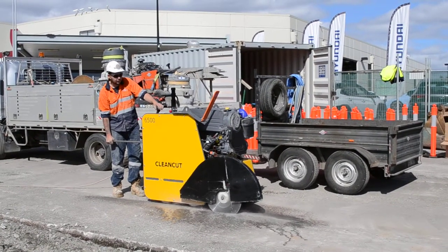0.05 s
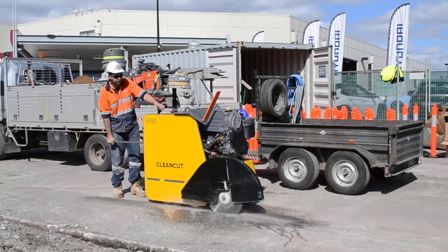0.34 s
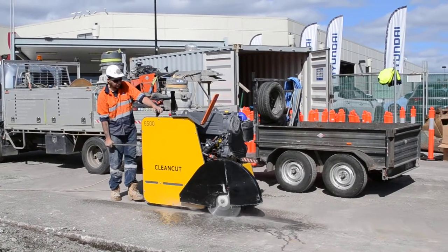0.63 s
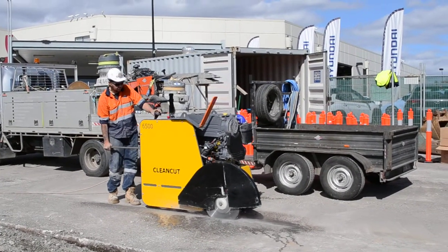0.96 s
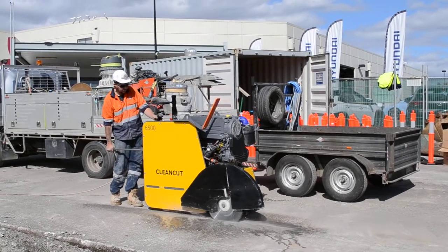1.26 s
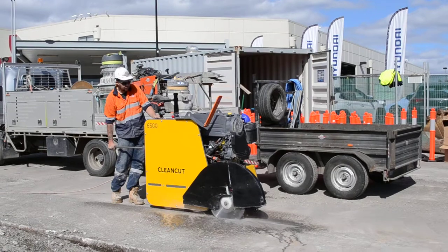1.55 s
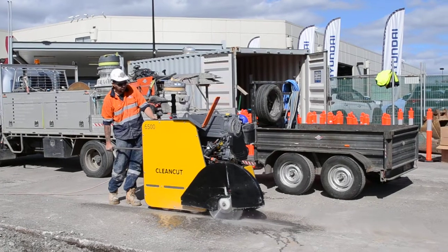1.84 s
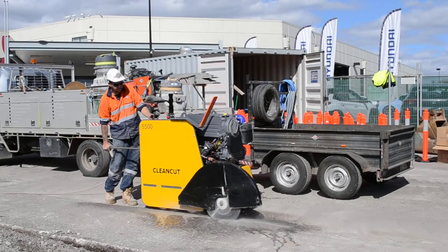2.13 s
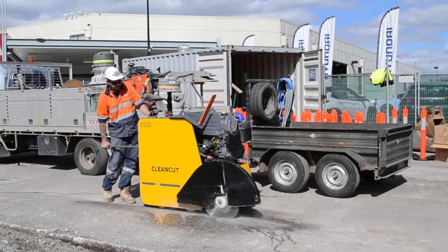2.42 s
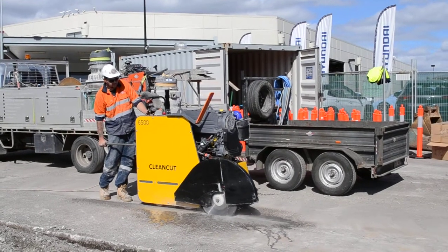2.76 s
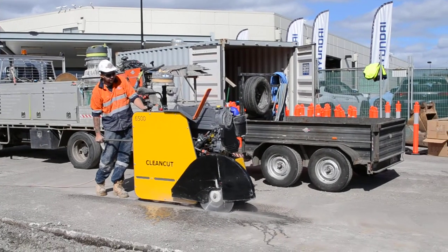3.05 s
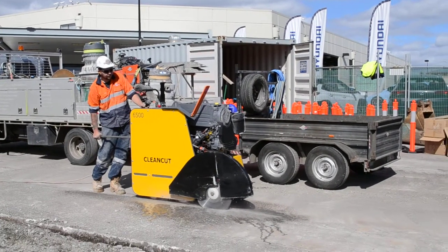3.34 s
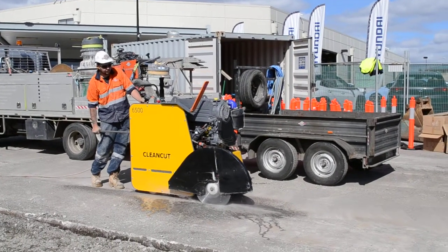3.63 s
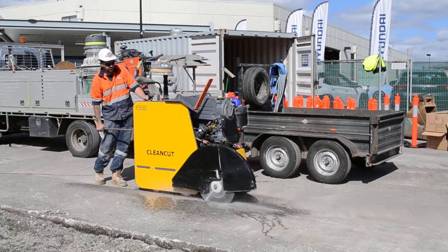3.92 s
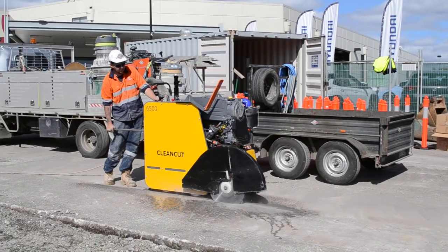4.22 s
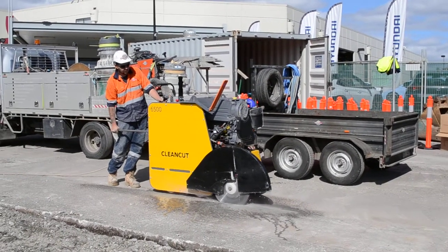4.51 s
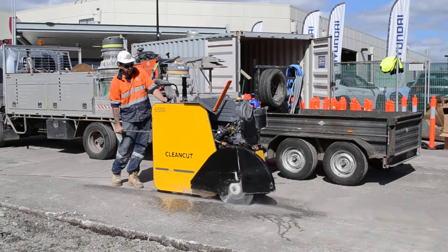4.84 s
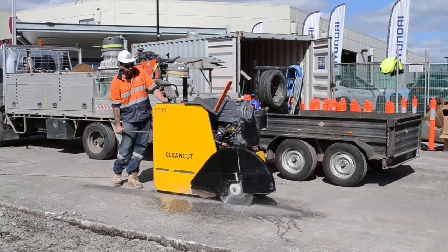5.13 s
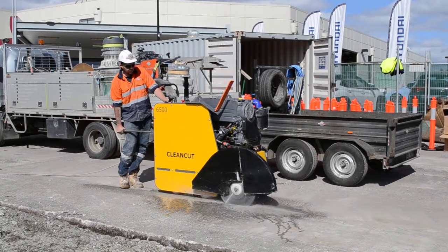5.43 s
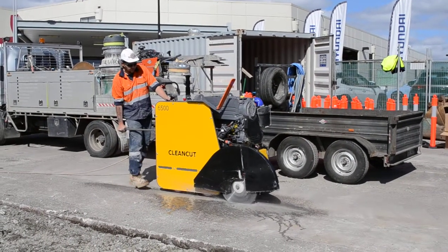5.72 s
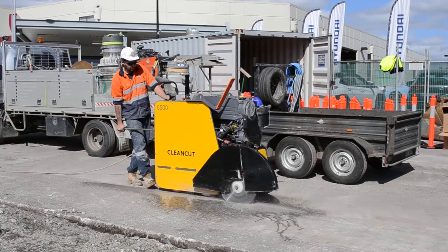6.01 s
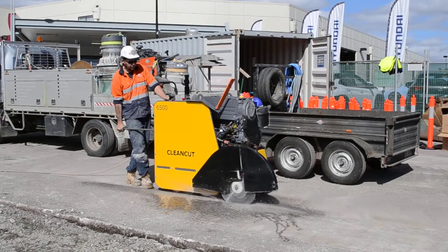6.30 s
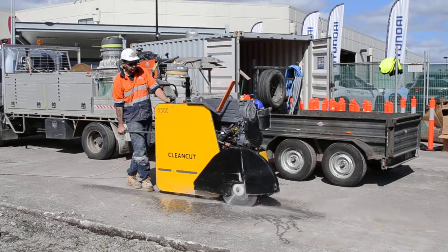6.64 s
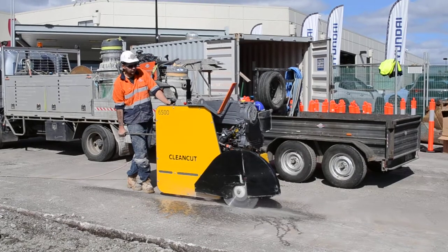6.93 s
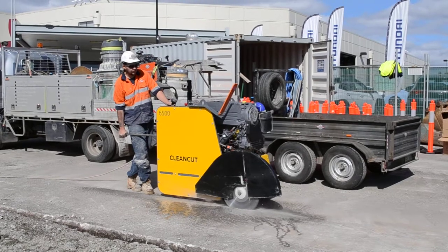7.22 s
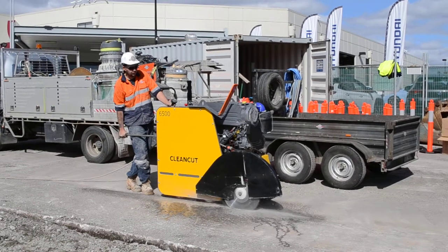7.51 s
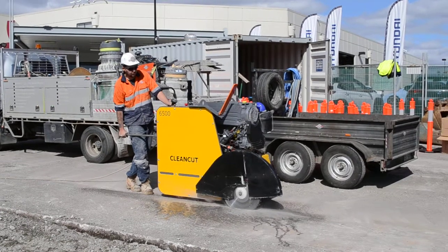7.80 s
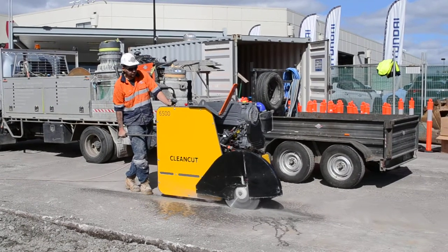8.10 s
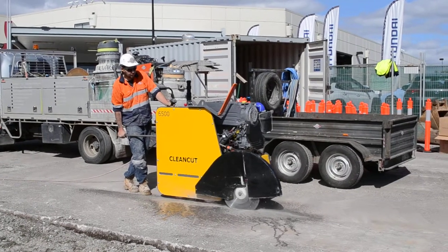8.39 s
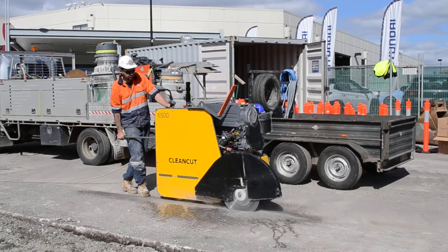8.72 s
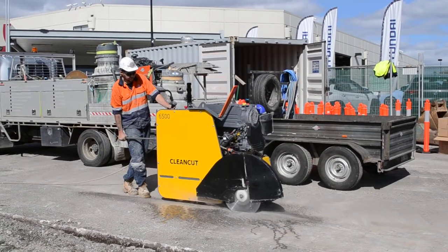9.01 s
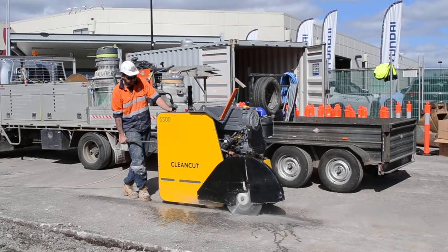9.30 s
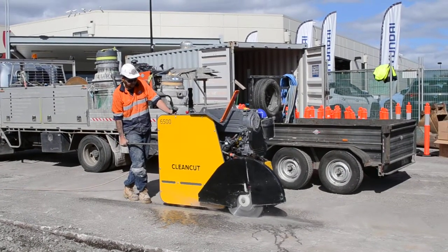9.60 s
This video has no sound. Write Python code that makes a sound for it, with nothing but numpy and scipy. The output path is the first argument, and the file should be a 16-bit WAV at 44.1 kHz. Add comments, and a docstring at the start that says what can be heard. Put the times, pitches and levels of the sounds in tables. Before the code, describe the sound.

A walk-behind road saw cuts wet pavement without a break in an open yard, heard from a few metres. The blade makes a harsh, ringing grind with fast chatter and a fine hiss of slurry. Its whine slides down and back up several times as it labours, and brief high metallic tones come and go. The engine drones steadily underneath.

```python
"""A harsh, ringing grind with a sliding whine: a walk-behind road saw cuts wet pavement in an open yard.
Diamond segments chatter and scrape in the slot, forcing the resonances of disc and guard and biting
once per turn, while slurry hisses. The blade slows under load, so its whine slides from mode to mode.
The engine drones underneath. All is heard in mono from a few metres."""
import sys
import numpy as np
from scipy import signal
from scipy.fft import rfft, irfft, next_fast_len
from scipy.io import wavfile
from scipy.ndimage import map_coordinates

SR = 44100
rng = np.random.default_rng(int(sys.argv[2]) if len(sys.argv) > 2 else 0)


def unload_wav(signal):
    """Save mono or channel-first audio to the path in sys.argv[1] as 16-bit WAV at rate SR, clipped to [-1, 1]."""
    wavfile.write(
        sys.argv[1],
        SR,
        np.round(np.clip(np.atleast_2d(signal).T, -1, 1) * 32767).astype(np.int16),
    )


N = 429975
SEGMENTS = 35  # around the blade's rim
# resonances of disc and guard (frequency [Hz], width [Hz], lift at ring=1 [dB])
BLADE_MODES = [(613, 28, 3.5), (762, 13, 0.5), (1080, 31, 1), (1269, 91, 8.5), (1424, 85, 7), (1525, 66, 6),
               (1780, 46, 1.5), (2060, 150, 2), (2473, 94, 8), (2620, 160, 5), (2800, 110, 3.5),
               (3106, 195, 5.5), (3560, 200, 6.5), (3690, 79, 6.5), (3876, 65, 4.5), (4060, 174, 5.5),
               (4255, 60, 5), (4366, 99, 5.5), (4725, 210, 7.5), (5276, 207, 10.5), (5803, 186, 9.5),
               (6200, 300, 7.5), (6476, 130, 9.5), (6930, 250, 8), (7680, 390, 10), (8310, 220, 10.5),
               (8700, 310, 3), (9120, 230, 4.5), (9590, 370, 5.5)]


def cutting(speed, turns, bite_db):
    """Superposition of friction noise and impacts; the noise throbs more deeply as the blade labours."""
    free_speed, bound_speed = 31, 23.4  # turns per second
    load = (free_speed - speed) / (free_speed - bound_speed)
    throb_db = 0.17 + 0.48 * load
    noise = grinding(turns, throb_db, load) + spray(turns, throb_db) + slot_rumble(turns, throb_db)
    return noise + chatter(turns, bite_db)


def grinding(turns, throb_db, load):
    """Abrasion: fracturing grit drives disc and guard with broadband noise."""
    # grit spectrum (frequency [Hz], relative density [dB])
    grit_spectrum = [(500, -42), (900, -13), (1200, -8.5), (1800, -2.5), (3000, -9.5), (4200, -1.63),
                     (5500, -7), (7300, -18), (8000, -28.5), (10000, -53)]
    light_start = np.exp(-(np.arange(N) / SR / 1.4) ** 2)  # the cut builds up over about 1.4 s
    gain_db = -18 + 0.2 * load - 0.17 * light_start
    force = scrape(turns, throb_db, stones_db=0.47)
    return amp(gain_db) * resonate(force, grit_spectrum, BLADE_MODES, ring=0.91)


def spray(turns, throb_db):
    """Amplitude modulation: the hiss of slurry pulses with the turning blade."""
    # hiss spectrum (frequency [Hz], relative density [dB])
    hiss_spectrum = [(5000, -49), (7300, -18), (8000, -16), (8800, -1.5), (10200, -15.5), (11200, -27),
                     (11600, -25.5)]
    # hiss envelope (time [s], relative level [dB])
    hiss_levels = [(0.0, -22.8), (1.25, -24.0), (5.5, -23.5), (5.75, -25.0), (7.0, -24.0), (8.5, -24.5),
                   (8.75, -27), (9.0, -24), (9.75, -24)]
    gain_db, = curves(hiss_levels)
    force = scrape(turns, 1.6 * throb_db, stones_db=0.54)
    return amp(gain_db + 0.3) * resonate(force, hiss_spectrum, BLADE_MODES)


def chatter(turns, bite_db):
    """Periodic impact: each segment strikes the slot once a turn, hardest on the blade's high side."""
    # spectrum of the blows (frequency [Hz], relative density [dB])
    contact_spectrum = [(200, -36), (650, -8.5), (820, -4.5), (900, -7.5), (1000, -11), (1300, -11.5),
                        (1600, -9), (1900, -7.5), (2400, -4), (3000, -13.5), (4300, -6), (5300, -5),
                        (6000, -14), (10000, -42)]
    # disc modes pumped as harmonics of the segment rate sweep past (frequency [Hz], width [Hz], lift [dB])
    disc_modes = [(1070, 37, 6), (1461, 60, 4), (1742, 130, 14), (2061, 195, 14.5), (2436, 90, 13),
                  (3600, 60, -7), (4060, 65, 10), (4300, 48, 6), (5220, 150, 16.5)]
    runout_db, wear_db, scatter_db, snag_db, jitter_ms = 6.0, 4.5, 2.5, 1.7, 0.052
    strike = np.arange(1, int(turns[-1] * SEGMENTS))
    wear = rng.standard_normal(SEGMENTS)[strike % SEGMENTS]
    snag = amp(snag_db * wobble(35))
    scatter, jitter = rng.standard_normal((len(strike), 2)).T
    high_side = np.cos(2 * np.pi * strike / SEGMENTS)
    force = amp(runout_db * high_side + wear_db * wear + scatter_db * scatter)
    at = np.interp(strike / SEGMENTS, turns, np.arange(N))
    at = np.clip(at + jitter * jitter_ms * SR / 10 ** 3, 0, N - 2)
    whole, part = at.astype(int), at % 1  # each blow is shared between two samples
    blows = np.bincount(whole, force * (1 - part), N) + np.bincount(whole + 1, force * part, N)
    return amp(-32 + bite_db) * resonate(snag * blows, contact_spectrum, disc_modes)


def slot_rumble(turns, throb_db):
    """Forced vibration: scraping in the slot gives the cut its low and middle range."""
    # rumble spectrum (frequency [Hz], relative density [dB])
    rumble_spectrum = [(20, -33), (45, -26), (80, -16.5), (150, -8.5), (250, -5.5), (350, -2.5),
                       (450, -1.5), (800, 2), (1100, -1), (1600, -9.5), (3000, -47.5)]
    gain_db = -33.5 + 0.13 * wobble(3)
    force = scrape(turns, throb_db, stones_db=1.4)
    return amp(gain_db) * resonate(force, rumble_spectrum, BLADE_MODES, ring=0.78)


def whine(speed, turns, bite_db):
    """Lock-in: the segment rate sounds as a tone, and its octave captures a disc mode when near it."""
    # envelope of the tone at the segment rate (time [s], level [dB])
    whine_levels = [(0, -54), (1.1, -53), (1.3, -40), (1.55, -54), (2.8, -53), (3.1, -45), (3.9, -41),
                    (4.3, -52), (5.0, -45), (5.25, -35), (5.45, -44), (6.3, -54), (6.9, -39), (7.15, -41),
                    (7.35, -39), (7.6, -44), (7.95, -44), (8.2, -49), (9.05, -41), (9.3, -33),
                    (9.75, -37.5)]
    # disc modes that lock on (frequency [Hz], capture range [Hz], level before bite and lock [dB])
    locking_modes = [(1727, 100, -33), (2064, 120, -33)]
    pull = 0.15  # share of the detuning that a locked mode follows
    segment_hz = SEGMENTS * speed
    level_db, = curves(whine_levels)
    out = amp(level_db) * rubbed_tone(segment_hz, turns, waver=0.008, runout_db=3.0, flutter_db=2.0)
    for hz, capture_hz, db in locking_modes:
        detuning = 2 * segment_hz - hz
        lock = 1 / np.sqrt(1 + (detuning / capture_hz) ** 4)
        mode = rubbed_tone(hz + pull * detuning, turns, waver=0.00649, runout_db=3.5, flutter_db=1.6)
        out += amp(db + bite_db) * lock * mode
    return out


def singing(turns):
    """Self-excited vibration: rubbing on the slot wall feeds single modes of the disc for a moment. One spell,
    near 2.4 kHz at 7.2-7.9 s, is different: a disc mode rung as the third harmonic of the segment rate sweeps
    past it."""
    # spells of singing (start [s], end [s], frequency [Hz], crest level before flutter [dB])
    spells = [(0, 1.45, 5250, -35), (1.193, 1.451, 1465, -32), (1.499, 1.9, 5230, -28),
              (1.9, 2.8, 5225, -34), (2.85, 3.3, 5225, -30), (3.3, 3.781, 1462, -31.5),
              (3.35, 3.652, 4760, -28), (3.78, 4.0, 5255, -30), (4.65, 5.173, 4320, -28.5),
              (5.27, 5.55, 4350, -31), (5.5, 5.9, 5220, -32), (5.65, 6.15, 4400, -38),
              (5.878, 6.12, 4740, -31), (6.029, 6.24, 2483, -37), (6.1, 6.95, 1275, -37),
              (6.5, 6.949, 5240, -36), (7.22, 7.88, 2413, -33), (7.28, 7.65, 4270, -28),
              (7.949, 8.8, 2462, -38), (8.2, 9.1, 4370, -31), (8.55, 8.9, 1443, -28.5)]
    t, out = np.arange(N) / SR, np.zeros(N)
    waver = 1 + 0.0058 * wobble(160)
    flutter_db = 1.3 * wobble(40) + 2.5 * np.cos(2 * np.pi * turns)
    for start, end, hz, db in spells:
        on = (t > start) & (t < end)
        swell = np.sqrt(np.abs(np.sin(np.pi * (t[on] - start) / (end - start))))
        out[on] += amp(db + flutter_db[on]) * swell * tone(hz * waver[on])
    return out


def engine():
    """Periodic combustion drives exhaust and housing; no two firings are timed quite alike."""
    # hunting around the governed speed (time [s], firing rate [Hz])
    hunting = [(0, 53.3), (.5, 52.1), (1.0, 54.4), (1.8, 53.6), (2.85, 50.45), (4.0, 52.86), (4.4, 51.6),
               (4.85, 53.1), (5.3, 52.5), (5.85, 54.3), (6.35, 51.35), (6.85, 52.74), (7.6, 51.86),
               (8.1, 50.46), (9.1, 50.8), (9.55, 52.8)]
    firing_hz, = curves(hunting)
    uneven_hz = firing_hz * (1 + 0.00505 * wobble(16))
    return exhaust(firing_hz, uneven_hz) + housing(firing_hz, uneven_hz)


def exhaust(firing_hz, uneven_hz):
    """A harmonic series on the firing rate, whose low orders grow most with engine speed."""
    # exhaust harmonics (order [x firing rate], relative level [dB])
    harmonics = [(1, -6), (2, 0), (3, -0.5), (8, 0)]
    governed_hz, half_rise_order = 52.9, 4.6
    rise_db = 1.9 * (firing_hz - governed_hz)
    level_db = -58.5 + 0.87 * wobble(45)  # firings vary in strength
    out = np.zeros(N)
    for order, db in harmonics:
        order_db = db + rise_db / (1 + (order / half_rise_order) ** 2) + 1.7 * wobble(6)
        out += amp(level_db + order_db) * tone(order * uneven_hz)
    return out


def housing(firing_hz, uneven_hz):
    """Resonance: the housing booms as the engine passes through one firing rate."""
    # booming partials (order [x firing rate], relative level [dB])
    partials = [(4, -5), (4.5, -6.5)]
    boom_db = -51.5 + resonance(firing_hz, centre=52.63, width=0.79, lift_db=4.5)
    return sum(amp(boom_db + db + 3.2 * wobble(14)) * tone(order * uneven_hz * (1 + 0.00513 * wobble(14)))
               for order, db in partials)


def casing():
    """Structural modes: the engine shakes its casing into three unsteady drones."""
    # casing resonances (frequency [Hz])
    drone_hz = [359.3, 623.6, 771.5]
    # drone envelopes (time [s], low drone [dB], middle drone [dB], high drone [dB])
    drone_levels = [(0, -60, -52, -50), (.5, -60, -47, -48), (1.4, -60, -47.5, -51), (2.0, -46, -51, -49),
                    (2.3, -56, -51, -49), (2.7, -58, -46, -49), (3.2, -50, -47, -50),
                    (4.3, -50.5, -50, -53), (5.1, -49, -52, -54), (6.2, -57, -60, -55),
                    (6.7, -48, -52, -49), (7.5, -53, -51, -49), (8.2, -64, -45.5, -47),
                    (8.75, -44, -46, -46), (9.05, -60, -47, -47), (9.75, -49, -55, -56)]
    return sum(amp(db + 1.8 * wobble(16)) * tone(hz * (1 + 0.01392 * wobble(30)))
               for hz, db in zip(drone_hz, curves(drone_levels)))


def yard(x):
    """Early reflection: trailer, truck and container add weak echoes to the direct sound."""
    # reflections (delay [s], gain [dB])
    echoes = [(.0041, -25.5), (.0137, -19.5), (.0212, -17.5), (.0335, -17)]
    return x + sum(amp(db) * np.pad(x, (round(delay * SR), 0))[:N] for delay, db in echoes)


def scrape(turns, runout_db, stones_db):
    """Countless grit fractures sum to Gaussian noise, swelling once a turn and at hard stones."""
    pressure_db = runout_db * np.cos(2 * np.pi * turns) + stones_db * wobble(45)
    return amp(pressure_db) * rng.standard_normal(N)


def rubbed_tone(hz, turns, waver, runout_db, flutter_db):
    """Amplitude and frequency modulation: a tone of rms 1 swells unevenly once a turn and trembles."""
    swell_db = runout_db * np.cos(2 * np.pi * turns) + flutter_db * wobble(32)
    return unit(amp(swell_db) * tone(hz * (1 + waver * wobble(110))))


def resonate(force, spectrum, modes, ring=1.0, size=8192):
    """Minimum-phase filtering to rms 1: modes stand on a broad spectrum, their lift scaled by ring."""
    hz = np.fft.rfftfreq(size, 1 / SR)
    knot_hz, knot_db = np.transpose(spectrum)
    broad_db = np.interp(np.log(hz + 1), np.log(knot_hz + 1), knot_db)
    lift_db = sum(resonance(hz, *mode) for mode in modes)
    cepstrum = irfft(np.log(amp(broad_db + ring * lift_db)))
    cepstrum[1:size // 2] *= 2  # folding onto positive time makes the response causal
    cepstrum[size // 2 + 1:] = 0
    response = irfft(np.exp(rfft(cepstrum)))
    return unit(signal.fftconvolve(force, response)[:N])


def resonance(hz, centre, width, lift_db):
    """A Lorentzian peak in dB; width is its full span in Hz at half height."""
    return lift_db / (1 + (2 * (hz - centre) / width) ** 2)


def tone(hz):
    """A sine of rms 1 whose phase is the integral of its frequency."""
    return np.sqrt(2) * np.sin(2 * np.pi * np.cumsum(hz) / SR)


def wobble(rate):
    """Smooth random fluctuation: a spline through rate knots a second."""
    return map_coordinates(rng.standard_normal(int(N * rate / SR) + 4), [np.arange(N) * rate / SR])


def curves(rows):
    """Linear interpolation of each column after the time, one value per sample."""
    times, *columns = np.transpose(rows)
    return [np.interp(np.arange(N) / SR, times, column) for column in columns]


def amp(db):
    """Decibels to amplitude ratio."""
    return 10 ** (np.asarray(db) / 20)


def unit(x):
    """Normalisation to rms 1."""
    return x / np.sqrt(np.mean(x ** 2) + 1e-20)


def scene():
    """Superposition of engine and blade, alike in both channels; one rotation times all blade sounds."""
    # the blade labours and recovers as the pavement resists (time [s], speed [turns/s], bite change [dB])
    labouring = [(0, 29.7, 2.5), (.58, 29.3, 1), (.76, 25.6, 4), (1.12, 23.9, 0), (1.3, 25.6, 1.5),
                 (1.7, 24.7, 1.5), (1.95, 22.2, -3), (2.3, 22.7, -2), (2.58, 25.3, 2), (2.95, 28.7, 2.5),
                 (3.4, 29.5, 1.5), (3.98, 29.8, 2.5), (4.28, 27.2, 1), (4.52, 29.6, 4), (4.95, 30.6, -1.5),
                 (5.3, 29.8, 3.5), (5.52, 26, 3.5), (5.8, 24.8, -1), (6.03, 22.6, -8), (6.24, 24.9, 5),
                 (6.4, 29.5, 3.5), (6.75, 30.3, 4), (7.0, 29.5, 0), (7.15, 27, 1), (7.33, 24.2, 1),
                 (7.57, 22.8, -2), (7.74, 23.2, 2), (7.88, 25.2, 3), (8.02, 28.6, 4), (8.25, 29.3, 5),
                 (8.5, 29.2, 0.5), (8.8, 29.2, 4), (9.03, 28.6, -2), (9.3, 30.2, 1), (9.75, 29.7, 3)]
    speed, bite_db = curves(labouring)
    jerked_speed = speed * (1 + 0.014 * wobble(110))  # stones jerk the rim and roughen the chatter
    turns = np.cumsum(jerked_speed) / SR
    drone = engine() + casing()
    tones = whine(speed, turns, bite_db) + singing(turns)
    saw = amp(-0.23) * yard(cutting(speed, turns, bite_db)) + tones + drone
    return np.array([saw, saw])


def record(dry):
    """Band limiting: an ideal low-pass filter removes the highest treble."""
    top_hz = 11600
    size = next_fast_len(N + SR // 2)
    passband = np.fft.rfftfreq(size, 1 / SR) < top_hz
    return irfft(rfft(dry, size) * passband, size)[:, :N]


dry = scene()
out = record(dry)
unload_wav(out)
```